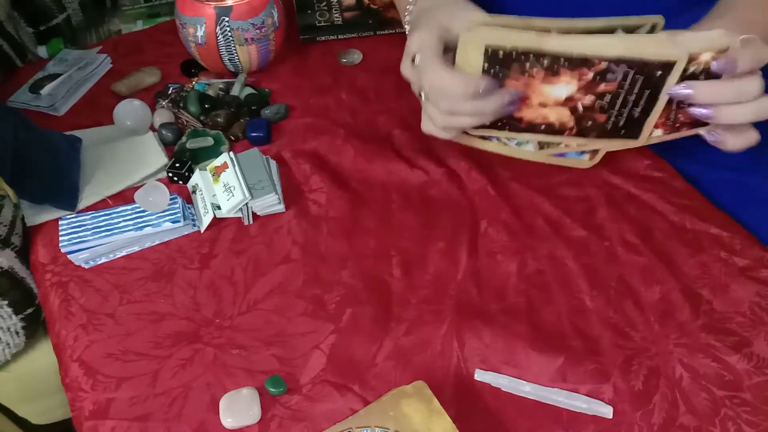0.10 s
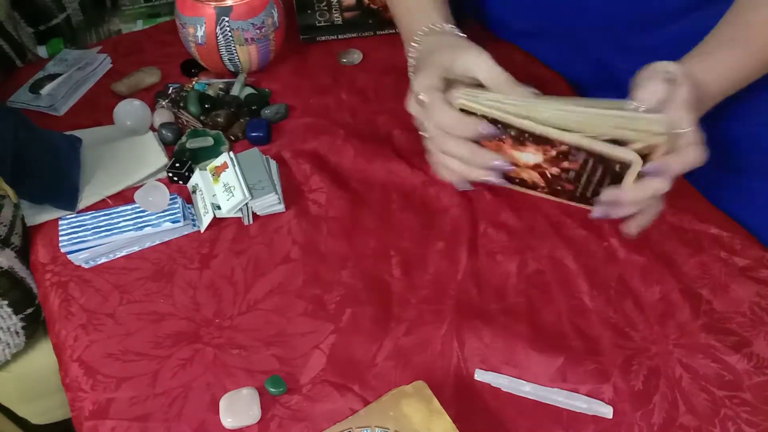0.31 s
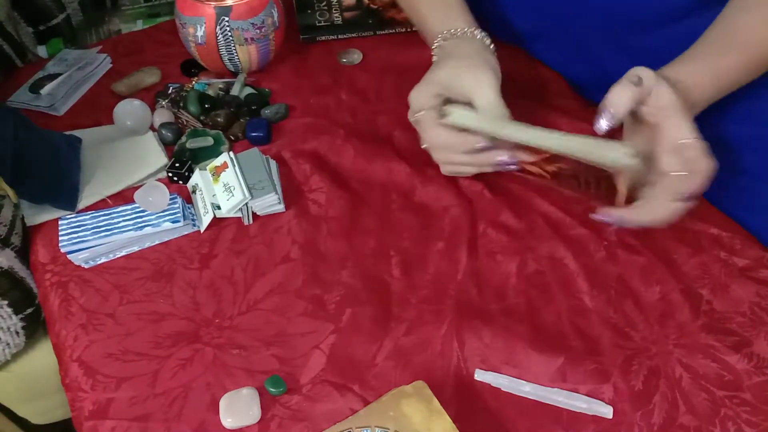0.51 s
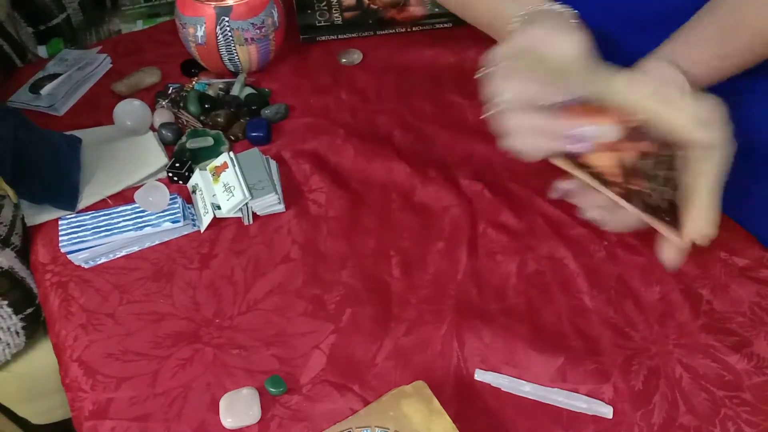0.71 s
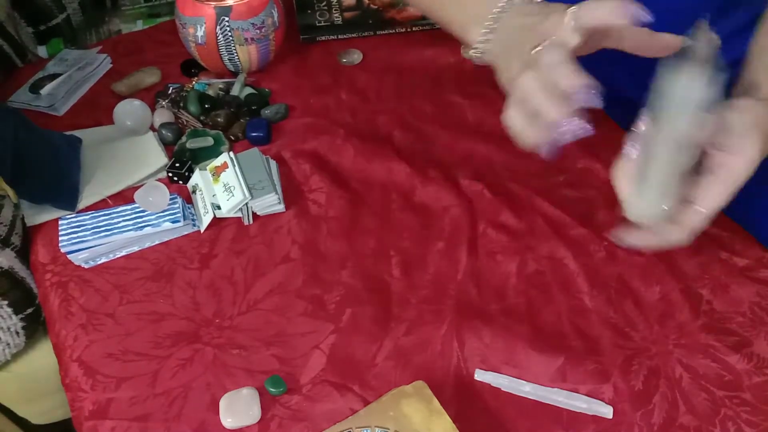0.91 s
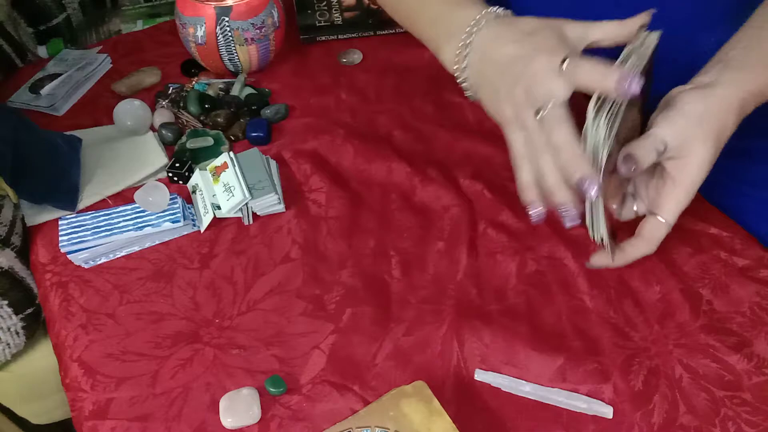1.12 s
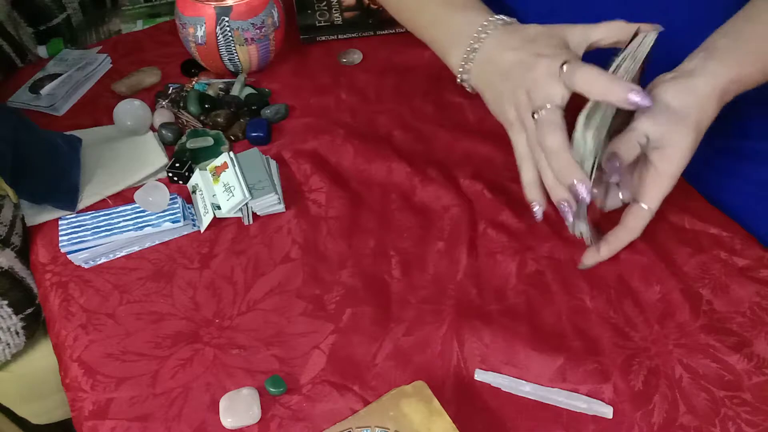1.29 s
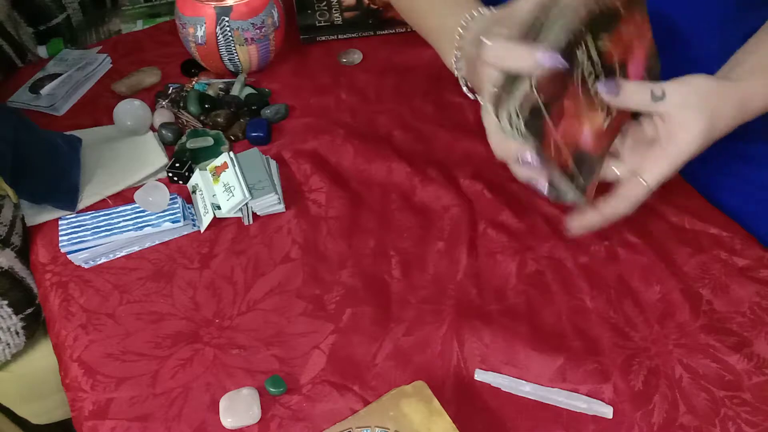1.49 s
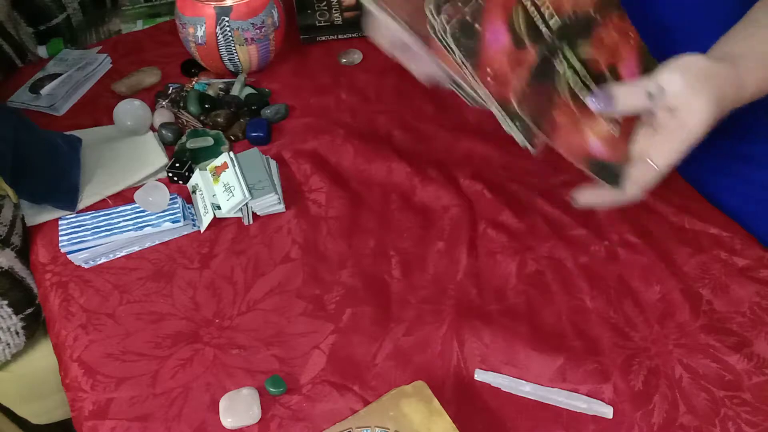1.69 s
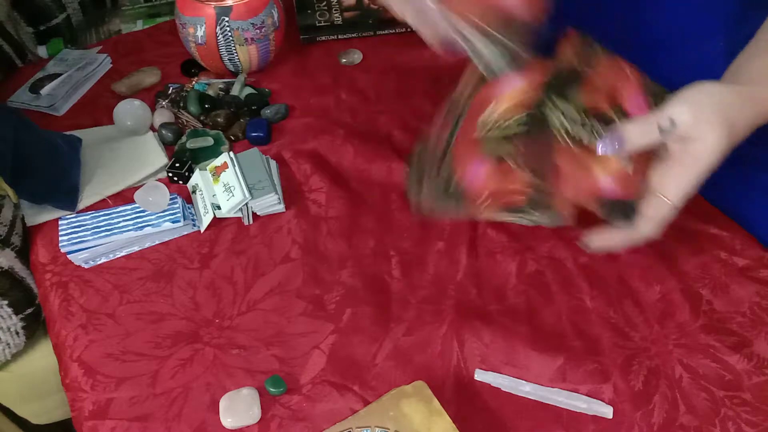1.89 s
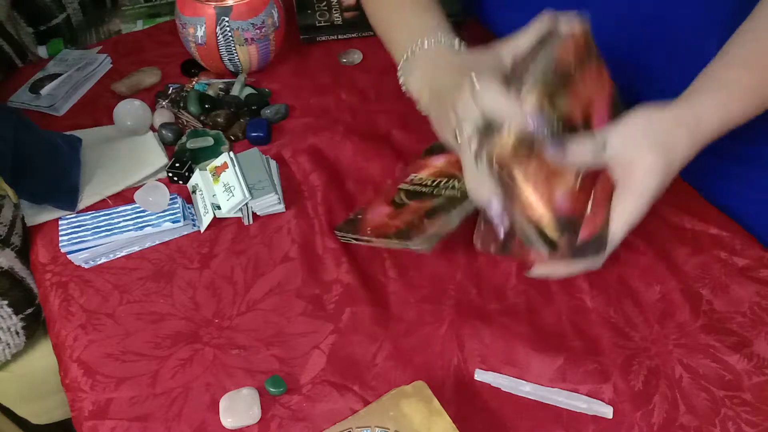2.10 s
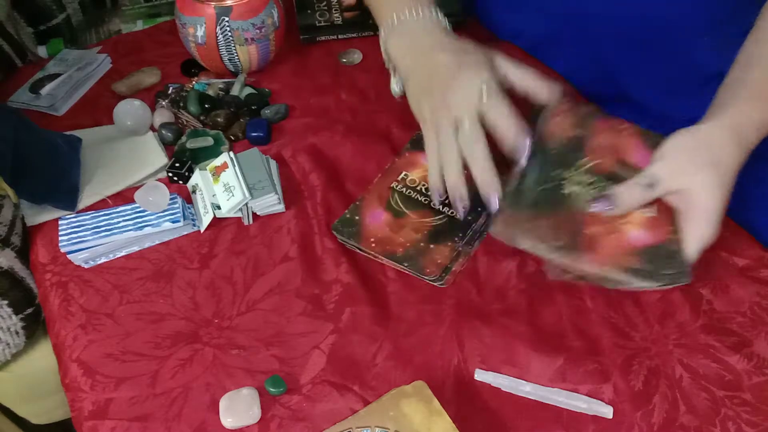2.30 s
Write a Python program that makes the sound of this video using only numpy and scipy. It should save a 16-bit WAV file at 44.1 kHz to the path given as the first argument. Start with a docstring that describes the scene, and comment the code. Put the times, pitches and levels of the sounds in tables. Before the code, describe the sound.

Large cards are shuffled by hand over a cloth-covered table: papery slides, a cluster of dull knocks, light taps and a click, a quiet pause, then a sharp snap with crackling edges and soft thuds; close, quiet small room.

```python
"""A deck of large cards is handled above a cloth-covered table in a small, quiet room.
First, card slides over card: swelling paper hiss, with faint singing bands of noise.
From 0.2 s the deck is knocked square: dull noise bursts that ring the table, then pitched hits and snaps.
Lighter slides, hits and snaps follow, and from 1.8 s loose edges flick past one another in a crackle.
Near 2 s packets snap together and one lands on the cloth. All is close and almost mono, over room tone."""
import sys
import numpy as np
from scipy import signal
from scipy.fft import rfft, irfft, next_fast_len
from scipy.io import wavfile
from scipy.ndimage import map_coordinates

SR = 44100
rng = np.random.default_rng(int(sys.argv[2]) if len(sys.argv) > 2 else 0)


def waveform_to_disk(signal):
    """Save audio, clipped to [-1, 1], as 16-bit WAV at the path in sys.argv[1]."""
    frames = np.transpose(np.atleast_2d(signal))
    scaled = np.clip(frames, -1, 1) * 32767
    samples = np.round(scaled).astype(np.int16)
    wavfile.write(sys.argv[1], SR, samples)


N = 110250
TIME = np.arange(N) / SR
HIT_TIME = np.arange(SR // 3) / SR  # time within one short sound

# Card slides over card: peak_s, rise_s, fall_s, level_db, tilt_db_per_octave
CARD_SLIDES = [(0.061, 0.083, 0.069, -43.5, -1.1), (0.182, 0.021, .03, -64.5, 0.5),
               (0.268, 0.057, 0.032, -46.5, -2.5), (0.356, 0.092, 0.093, -45.5, 0.85),
               (0.521, .09, 0.049, -53.5, -3), (0.717, 0.025, 0.17, -56, 1),
               (.785, 0.038, 0.041, -40.5, 4.5), (.843, 0.042, 0.044, -51.5, 0.5),
               (1.039, 0.29, 0.2, -71.5, 5), (1.345, 0.013, 0.027, -59, 2), (1.41, 0.094, 0.18, -61.5, 5.5),
               (1.621, 0.045, 0.059, -65, 1), (1.70, .05, 0.078, -51.5, -1),
               (1.775, 0.057, 0.062, -47.5, 3), (1.87, 0.16, 0.17, -60, -7.5),
               (1.965, 0.15, 0.034, -59.5, -1.5), (2.011, 0.028, 0.094, -37.5, -1.5),
               (2.072, 0.04, 0.077, -41, -4.5), (2.133, 0.057, 0.054, -39.5, 0.4),
               (2.205, 0.051, 0.086, -39, -.5), (2.315, 0.11, 0.028, -58, -4)]
# Tone colour of the paper hiss: pitch_hz, level_db
PAPER_COLOUR = [(100, -39), (350, -17.5), (570, -2), (880, -4), (1300, 3), (2500, 1), (4400, -3),
                (7000, -6.5), (10000, -1.5), (15000, -15)]
# Rubbing cards sing in narrow bands: peak_s, half_length_s, level_db, pitch_hz,
# glide_octaves_per_s, width_hz
SINGING_BANDS = [(0.065, 0.018, -42, 1179, 7, 258), (.06, 0.018, -51.5, 600, 2.5, 130),
                 (0.179, 0.012, -63, 2710, -1.5, 450), (0.36, 0.097, -59.5, 1271, -0.5, 163),
                 (0.494, 0.04, -60, 1260, 1, 149), (.272, .02, -36, 899, 1, 348),
                 (0.856, .015, -57.5, 1330, -5.5, 190), (1.019, 0.043, -63, 1340, 2.5, 220),
                 (1.093, 0.042, -67.5, 1293, 0, 110), (1.095, 0.038, -69, 525, 0.5, 59),
                 (1.482, 0.022, -63.5, 1746, 1.5, 598), (1.532, 0.02, -69.5, 1257, 1, 121),
                 (1.581, 0.025, -72, 6840, 0.5, 414), (1.675, 0.0051, -48.5, 1313, -1, 139),
                 (1.702, 0.0054, -42, 1605, -0.5, 300), (1.969, 0.0049, -57, 6700, -8, 600),
                 (2.172, 0.013, -44, 1380, 1.5, 403)]
# The deck meets the padded table: start_s, level_db, treble_corner_hz
TABLE_THUMPS = [(0.223, -29, 378), (.232, -32, 800), (0.241, -19.5, 220), (.245, -29.5, 1006),
                (0.256, -25, 704), (.266, -21.5, 1400), (.273, -20.5, 663), (.279, -21, 1250),
                (.297, -31, 800), (0.311, -32.5, 650), (0.33, -45, 318), (0.361, -50, 800),
                (0.526, -43.5, 161), (.764, -43, 600), (1.355, -45, 167), (1.721, -42, 170),
                (1.991, -35.5, 595), (2.010, -30, 903), (2.021, -21, 133.8), (2.039, -35, 506),
                (2.062, -33, 500), (2.104, -29, 190), (2.182, -23, 201), (2.198, -29.5, 150),
                (2.221, -30.5, 145)]
# Tone colour of the padded blow: pitch_hz, level_db
BLOW_COLOUR = [(30, -20.5), (70, -13), (120, -6), (200, -1.5), (400, -3.5), (650, -9), (1000, -9),
               (1350, 0), (1550, -11), (3000, -25), (5000, -27), (12000, -41)]
# Ringing tones of the table: pitch_hz, level_db, decay_s (time to fall 60 dB)
TABLE_MODES = [(95.2, -22, 0.38), (154.1, -12.5, 0.18), (198, -15.5, 0.19), (319.6, 0, 0.085),
               (378.7, -2.5, 0.073), (465.6, 4, 0.099), (590, -6.5, 0.12), (726, -14, 0.16),
               (827.4, -1.5, 0.062), (919.5, -3.5, 0.08), (1070, -12, 0.09)]
# Soft contacts on the pack, and the pitched bodies of thumps and slaps; one hit may have
# several rows: start_s, level_db, decay_s, pitch_hz
PITCHED_HITS = [(.268, -42, 0.051, 1990), (.279, -40, .09, 1720), (.414, -41, 0.047, 720),
                (0.4136, -32.5, 0.021, 2500), (.414, -37, 0.058, 7600), (0.757, -41.5, 0.059, 1680),
                (.764, -29.5, 0.025, 3050), (0.764, -36, 0.065, 1340), (0.764, -39, 0.071, 525),
                (1.671, -51, 0.057, 4900), (1.6942, -34, 0.057, 1600), (1.806, -35, 0.033, 814),
                (1.809, -42.5, 0.092, 512), (1.809, -40, 0.047, 1890), (1.821, -35.5, 0.025, 1180),
                (1.8559, -42, 0.038, 1320), (1.9134, -48.5, .03, 2000), (1.921, -42.5, 0.063, 760),
                (1.946, -50, 0.055, 700), (1.9918, -44, 0.029, 1000), (1.997, -37.5, 0.022, 3000),
                (2.005, -10, .005, 2450), (2.008, -22.5, 0.032, 918), (2.016, -33, .06, 550),
                (2.017, -28, 0.037, 1217), (2.041, -27.5, 0.015, 1200), (2.062, -27, 0.043, 1650),
                (2.104, -34, 0.044, 835), (2.198, -33, 0.033, 1740), (2.219, -29.5, 0.018, 1550),
                (2.2865, -38, 0.021, 1170), (2.315, -45.5, 0.042, 1108)]
# Card edges snap on the pack: start_s, level_db, decay_s
EDGE_SNAPS = [(0.4149, -40.5, 0.0123), (0.763, -27.5, 0.055), (0.7669, -27.5, 0.02), (0.972, -61.5, 0.046),
              (1.694, -43, 0.034), (1.8864, -51, 0.012), (1.9133, -43.5, 0.011), (2.0056, -12, 0.007),
              (2.0113, -31.5, 0.085), (2.064, -42, .03), (2.0977, -29, .007), (2.1897, -32.5, .012),
              (2.1973, -31, 0.02), (2.2184, -33, 0.017), (2.252, -40, 0.009)]
# Resonances of the held pack: pitch_hz, width_hz, level_db
PACK_RESONANCES = [(560, 250, -6), (1310, 250, 1.5), (1750, 400, -2), (2500, 280, 2.5), (3630, 340, 3.5),
                   (5100, 600, -3), (6860, 690, -3), (10500, 6600, -6)]
# Edges of loose cards flick past one another: start_s, length_s, level_db, pitch_hz
EDGE_FLURRIES = [(1.80, 0.19, -54.5, 2320), (2.012, .105, -34, 2100), (2.184, 0.07, -33, 2760),
                 (2.261, .06, -50, 1700)]
# How long the room's late tail lasts: pitch_hz, decay_s (time to fall 60 dB)
ROOM_DECAY = [(150, 0.35), (1000, 0.27), (4000, .2), (14000, 0.086)]
# Microphone response: pitch_hz, level_db
MIC_RESPONSE = [(20, 0.5), (7400, -1), (7900, -13), (12000, -16.5), (13800, -22), (15000, -3.5),
                (15600, -14.5)]
# Tone colour of the room tone: pitch_hz, level_db
ROOM_TONE_COLOUR = [(15, -17), (30, -14.5), (60, -7.5), (110, -2.5), (250, -5.5), (500, -11), (1000, -15),
                    (1270, -7), (1500, -16), (2200, -18), (7700, -30), (15500, -31.5)]

SLIDE_FADE_DB = 25.5  # drop after one rise or fall time
GRAINS_PER_S, GRAIN_SHARE = 1500, 0.38  # paper fibres catching, and their share of the power
RIPPLE_DB, RIPPLE_HZ = 1.5, 259.5  # each grip has its own resonances: strength, spacing
JUDDER_DB, JUDDER_PER_S = 1.25, 130  # the stroke sticks and slips: strength, speed
THUMP_DECAY_S, TABLE_DB = 0.037, -6  # cloth damps the blow; gain of the table ring
BODY_SHARPNESS, BODY_ATTACK_S = 3.8, 0.0008  # a soft contact starts gently
BODY_BASS_END, BODY_TREBLE_END = 0.68, 4.4  # multiples of the pitch
FLICKS_PER_S, FLICK_DECAY_S = 210, 0.0066
FLICK_SPREAD_DB, FLURRY_FALL_DB = 5.5, 4.5  # chance level changes; drop over a flurry
RING_HZ, RING_DECAY_S = 1276.5, 0.1
TAIL_DB, WALL_DB, RING_DB = -20, -11, -21.5  # late tail, early reflections, narrow ring
ROOM_TONE_DB, SIDE_HISS_DB = -70, -77  # side hiss has opposite signs in left and right
MIC_BASS_HZ, TOP_HZ = 86, 15700  # bass roll-off; upper band limit


def amp(db):
    """Turn decibels into gain."""
    return 10 ** (np.asarray(db) / 20)


def unit(x):
    """Scale to an average (rms) level of 1."""
    return x / np.sqrt(np.mean(x ** 2) + 1e-20)


def along(points, hz):
    """Read a curve of (Hz, value) points on a log frequency axis."""
    point_hz, value = np.transpose(points)
    return np.interp(np.log(hz + 1), np.log(point_hz + 1), value)


def fade(t, decay_s):
    """Exponential decay that falls 60 dB in decay_s."""
    return np.exp(-np.log(1000) * t / np.maximum(decay_s, 1e-3))


def coloured(x, gain, keep_power=True):
    """Filter by a gain over frequency, without sound ahead of time; white noise can keep its power."""
    m = 2 * next_fast_len(x.shape[-1])
    g = gain(np.fft.rfftfreq(m, 1 / SR))
    if keep_power:
        g = unit(g)
    # folding the cepstrum forward gives a filter that responds only after its input
    cepstrum = irfft(np.log(np.maximum(g, 1e-6)), m)
    cepstrum[1:m // 2] *= 2
    cepstrum[m // 2 + 1:] = 0
    response = np.exp(rfft(cepstrum))
    return irfft(rfft(x, m) * response, m)[..., :x.shape[-1]]


def add(track, s, x):
    """Mix x into the track at time s."""
    i = max(round(s * SR), 0)
    track[i:i + len(x)] += x[:max(N - i, 0)]


def uneven(position):
    """A smooth random curve with one knot per unit of position."""
    return map_coordinates(rng.standard_normal(2048), [position], mode="wrap")


def burst(decay_s):
    """The noise of one short hit: a dying spray with a nearly even spectrum."""
    env = fade(HIT_TIME, decay_s)
    x = rng.standard_normal(len(HIT_TIME)) * env
    for _ in range(2):
        flat = irfft(np.exp(1j * np.angle(rfft(x))), len(x))  # equal strength at every pitch
        x = flat * env ** .25
    return unit(x) * np.sqrt(np.mean(env ** 2))


def slides():
    """Each stroke swells and fades: juddering paper hiss with fine grains where fibres catch."""
    out = np.zeros(N)
    for peak_s, rise_s, fall_s, db, tilt in CARD_SLIDES:
        away = np.maximum((peak_s - TIME) / rise_s, (TIME - peak_s) / fall_s)
        grains = unit((rng.random(N) < GRAINS_PER_S / SR) * rng.standard_normal(N))
        rub = np.sqrt(GRAIN_SHARE) * grains + np.sqrt(1 - GRAIN_SHARE) * rng.standard_normal(N)
        stroke_db = db - SLIDE_FADE_DB * np.abs(away) ** 1.614
        judder_db = JUDDER_DB * uneven(TIME * JUDDER_PER_S)

        def paper(f):
            grip_db = RIPPLE_DB * uneven(f / RIPPLE_HZ)
            return amp(along(PAPER_COLOUR, f) + tilt * np.log2(f + 100) + grip_db)
        out += coloured(rub * amp(stroke_db + judder_db), paper)
    return out


def hollows():
    """Rubbing excites the air gaps between hands and cards, or makes an edge squeak faintly."""
    out = np.zeros(N)
    u = HIT_TIME - HIT_TIME.mean()  # time from the peak
    for peak_s, half_s, db, hz, glide, width_hz in SINGING_BANDS:
        phase = 2 * np.pi * np.cumsum(hz * 2 ** (glide * u)) / SR
        # slow noise on a gliding tone makes a moving band of noise
        band = coloured(rng.standard_normal((2, len(u))), lambda f: 1 / (1 + (2 * f / width_hz) ** 2))
        env = np.exp(-(u / half_s) ** 2)
        tone = env * (band[0] * np.cos(phase) + band[1] * np.sin(phase))
        tone = unit(tone) * np.sqrt(np.mean(env ** 2))
        start_s = peak_s + u[0]
        cut = max(round(-start_s * SR), 0)  # drop what lies before time zero
        add(out, start_s, amp(db) * tone[cut:])
    return out


def table_ring():
    """The table's own tones, building up softly and dying away."""
    ring = np.zeros(len(HIT_TIME))
    for k, (hz, db, decay_s) in enumerate(TABLE_MODES):
        strength = (-1) ** k * amp(db + rng.normal(0, 1))  # each blow excites them a bit differently
        ring += strength * fade(HIT_TIME, decay_s) * np.sin(2 * np.pi * hz * HIT_TIME)
    return ring * (1 - fade(HIT_TIME, 0.013))


def thumps():
    """Padded blows of noise ring the table; a treble corner sets how bright each one is."""
    out = np.zeros(N)
    for s, db, corner_hz in TABLE_THUMPS:
        blow = coloured(burst(THUMP_DECAY_S), lambda f: amp(along(BLOW_COLOUR, f)))
        blow = blow + amp(TABLE_DB) * table_ring()
        dulled = coloured(blow, lambda f: 1 / np.hypot(1, (f / corner_hz) ** 2.47), keep_power=False)
        add(out, s, amp(db) * dulled)
    return out


def pitched_hit(decay_s, hz):
    """One softly starting noise burst through a broad resonance at the given pitch."""
    def body(f):
        bass_cut = np.hypot(1, (BODY_BASS_END * hz / (f + 1)) ** 2)
        treble_cut = np.hypot(1, (f / (BODY_TREBLE_END * hz)) ** 2)
        peak = 1 / np.hypot(1, BODY_SHARPNESS * (f / hz - hz / (f + 1)))
        return peak / (bass_cut * treble_cut)
    return coloured(burst(decay_s) * (1 - np.exp(-HIT_TIME / BODY_ATTACK_S)), body)


def pitched_hits():
    """Soft contacts on the pack, and the pitched bodies of thumps and slaps, as resonant noise."""
    out = np.zeros(N)
    for s, db, decay_s, hz in PITCHED_HITS:
        add(out, s, amp(db) * pitched_hit(decay_s, hz))
    return out


def snaps():
    """Short cracks of card edges: noise bursts coloured by the resonances of the pack."""
    def pack(f):
        power = 0
        for hz, width_hz, db in PACK_RESONANCES:
            power = power + amp(db) ** 2 / (1 + ((f - hz ** 2 / (f + 1)) / width_hz) ** 2)
        return np.sqrt(power)
    out = np.zeros(N)
    for s, db, decay_s in EDGE_SNAPS:
        add(out, s, amp(db) * coloured(burst(decay_s), pack))
    return out


def flurries():
    """Edges of loose cards flick past each other: a dense, uneven crackle that dies down."""
    out = np.zeros(N)
    for start_s, length_s, db, hz in EDGE_FLURRIES:
        for k, (late, size, pitch) in enumerate(rng.standard_normal((48, 3))):
            s = (k + .5 * late) / FLICKS_PER_S
            if s < length_s:
                flick_db = db + FLICK_SPREAD_DB * min(size, 1) - FLURRY_FALL_DB * s / length_s
                flick_hz = hz * 2 ** (.7 * pitch)
                add(out, start_s + s, amp(flick_db) * pitched_hit(FLICK_DECAY_S, flick_hz))
    return out


def room(x):
    """The room answers with early reflections, a short tail of fading noise and one narrow ring."""
    hz, t, z = signal.stft(rng.standard_normal(len(HIT_TIME)), SR, nperseg=256)
    z = z * fade(t, along(ROOM_DECAY, hz)[:, None])  # each pitch fades at its own rate
    tail = signal.istft(z, SR, nperseg=256)[1][:len(HIT_TIME)]
    tail = tail * (1 - fade(HIT_TIME, 0.029))  # the tail builds up softly
    walls = np.zeros(len(HIT_TIME))
    delays = rng.uniform(0.0018, .022, size=14)  # s
    walls[(delays * SR).astype(int)] = rng.choice([-1, 1], size=14) * fade(delays, 0.091)
    ring = np.sin(2 * np.pi * RING_HZ * HIT_TIME) * fade(HIT_TIME, RING_DECAY_S)
    parts = [(TAIL_DB, tail), (WALL_DB, walls), (RING_DB, ring)]
    answer = sum(amp(db) * h / np.linalg.norm(h) for db, h in parts)
    return x + signal.fftconvolve(x, answer)[:N]


def mic(f):
    """The microphone's gain over frequency, with its bass rolled off."""
    bass_cut = .01 + 1 / np.hypot(1, (MIC_BASS_HZ / (f + 1)) ** 3)
    return amp(along(MIC_RESPONSE, f)) * bass_cut


def scene():
    """Cards in the middle, over faint room tone and a little stereo hiss."""
    cards = room(slides() + hollows() + thumps() + pitched_hits() + snaps() + flurries())
    cards = coloured(cards, mic, keep_power=False)
    tone = coloured(rng.standard_normal(N), lambda f: amp(along(ROOM_TONE_COLOUR, f)))
    side = coloured(rng.standard_normal(N), lambda f: (f + 20) ** -.4)
    middle = cards + amp(ROOM_TONE_DB) * tone
    side = amp(SIDE_HISS_DB) * side
    return np.array([middle + side, middle - side])


def record(dry):
    """Remove everything from the upper band limit upward."""
    m = next_fast_len(N + SR // 4)
    keep = np.fft.rfftfreq(m, 1 / SR) < TOP_HZ
    return irfft(rfft(dry, m) * keep, m)[:, :N]


dry = scene()
out = record(dry)
waveform_to_disk(out)
```